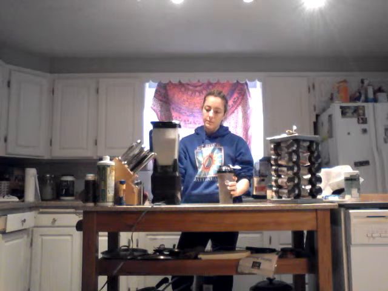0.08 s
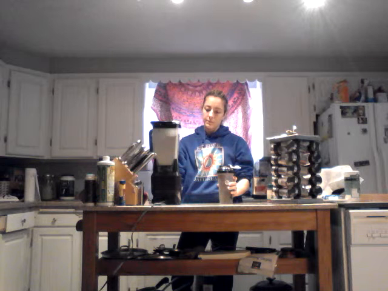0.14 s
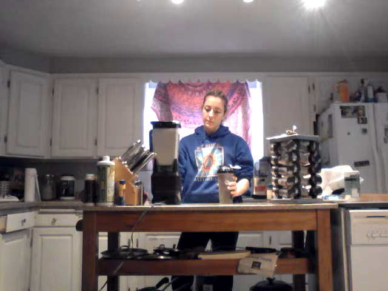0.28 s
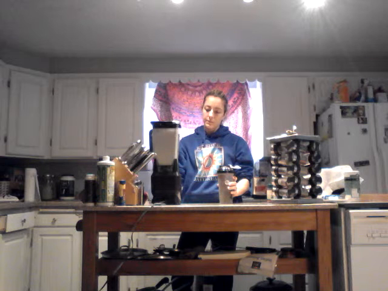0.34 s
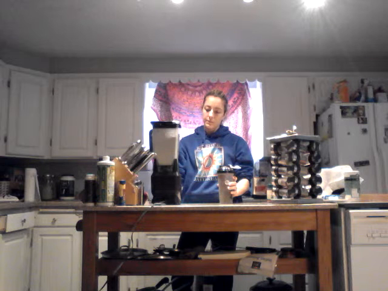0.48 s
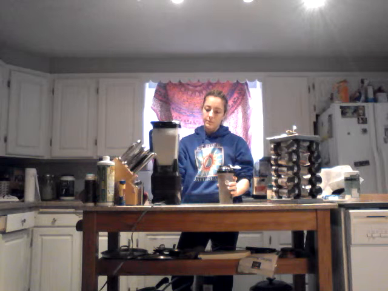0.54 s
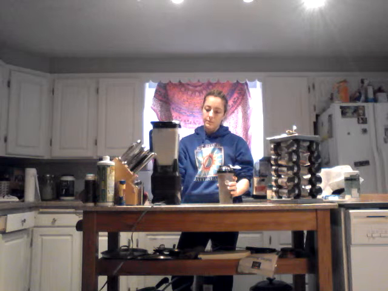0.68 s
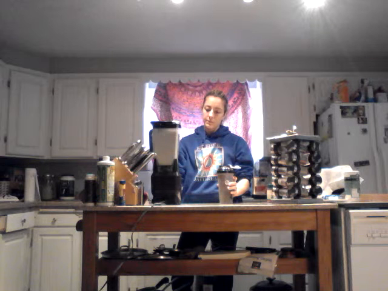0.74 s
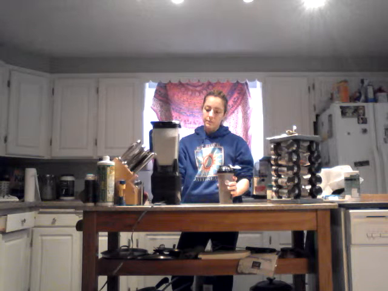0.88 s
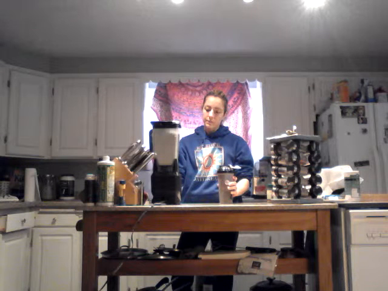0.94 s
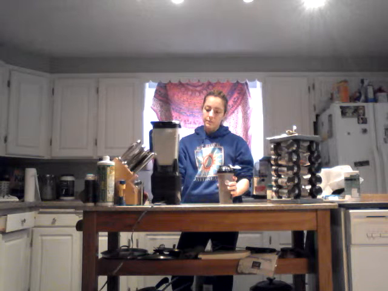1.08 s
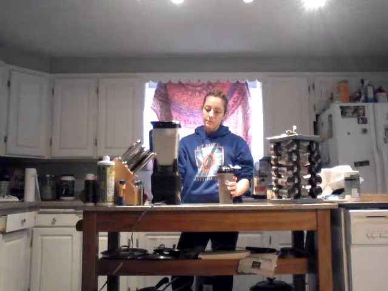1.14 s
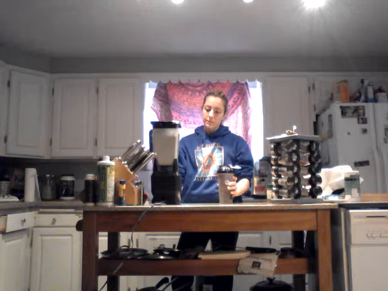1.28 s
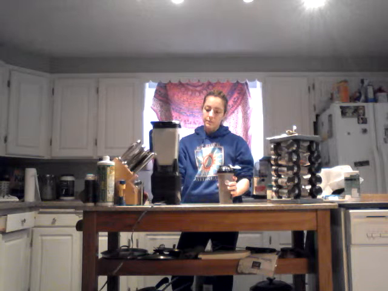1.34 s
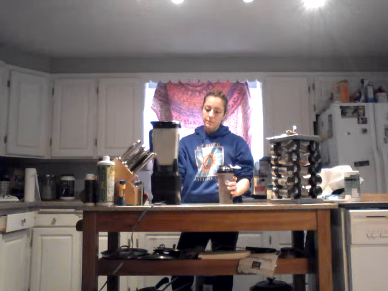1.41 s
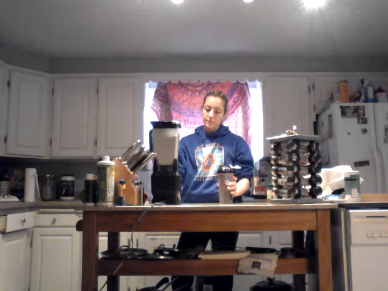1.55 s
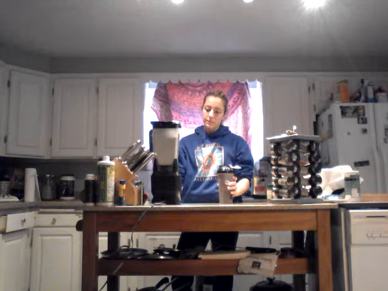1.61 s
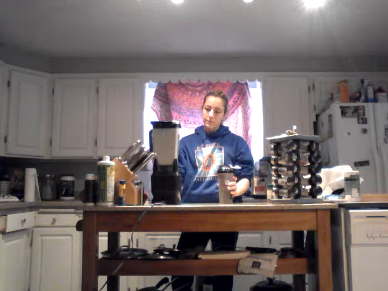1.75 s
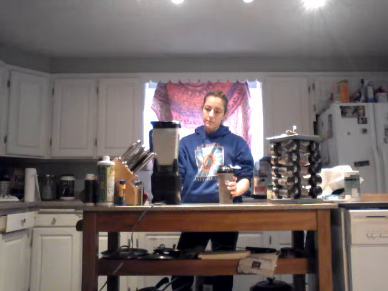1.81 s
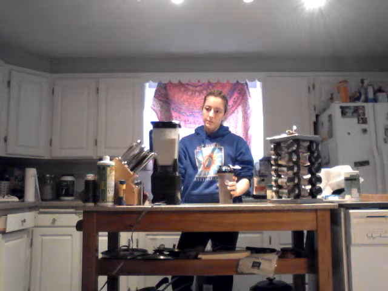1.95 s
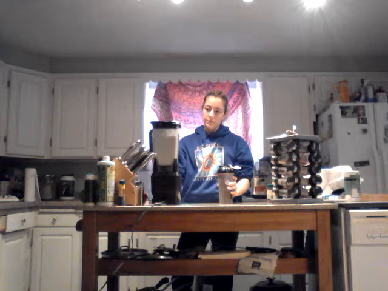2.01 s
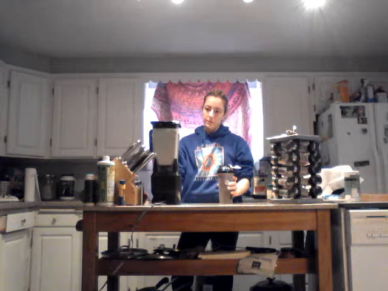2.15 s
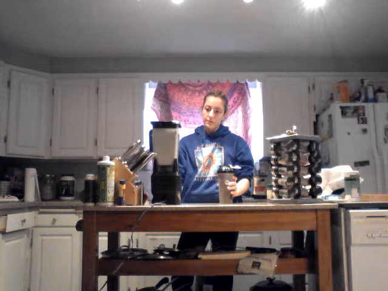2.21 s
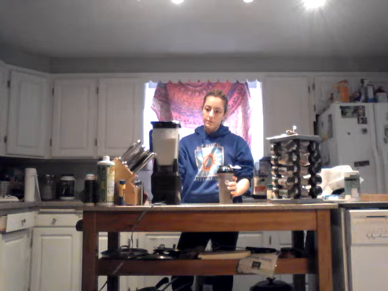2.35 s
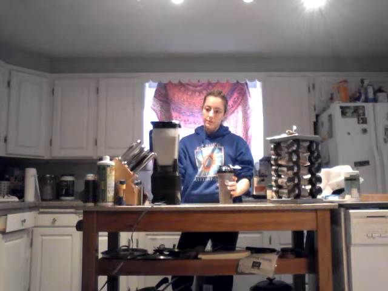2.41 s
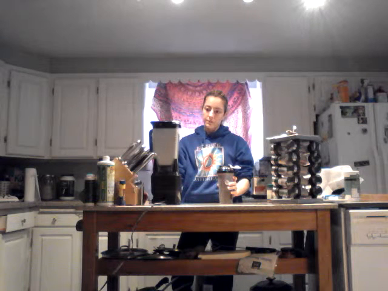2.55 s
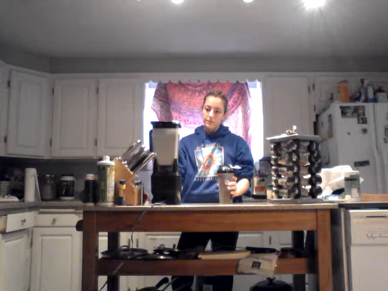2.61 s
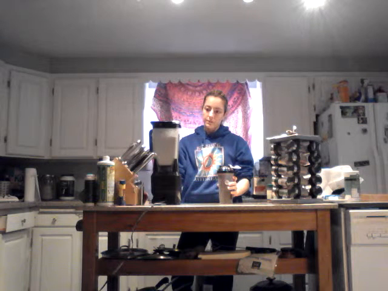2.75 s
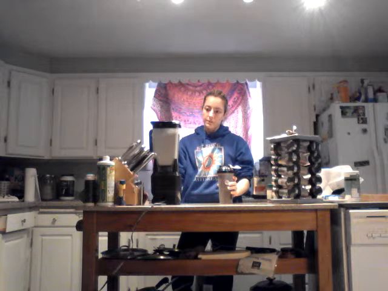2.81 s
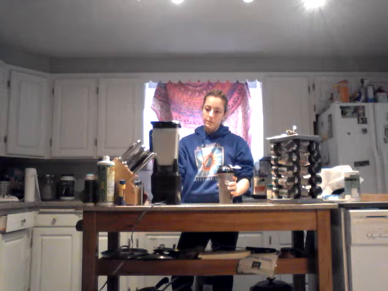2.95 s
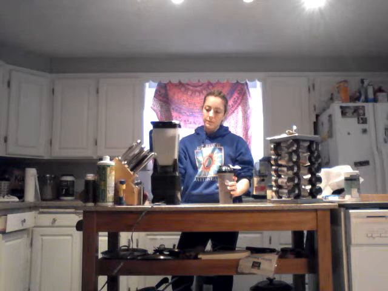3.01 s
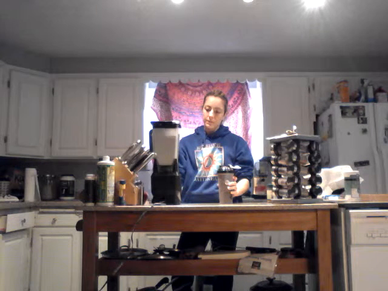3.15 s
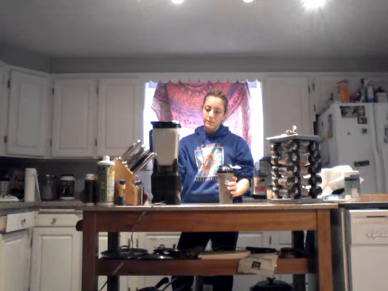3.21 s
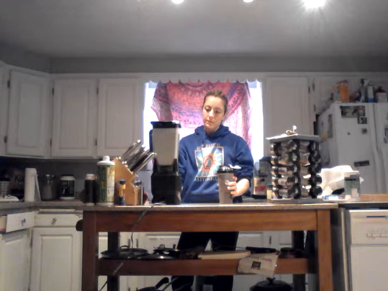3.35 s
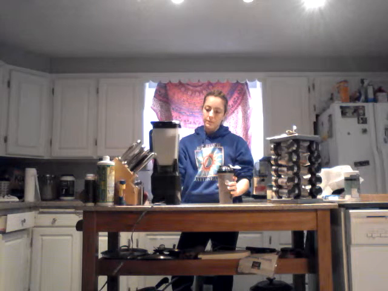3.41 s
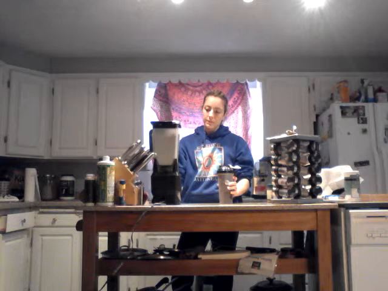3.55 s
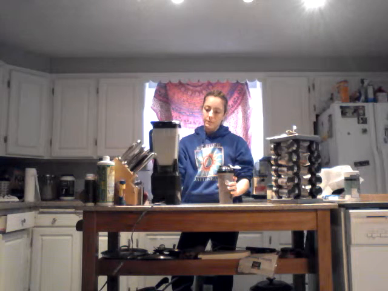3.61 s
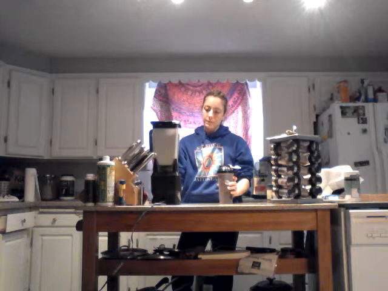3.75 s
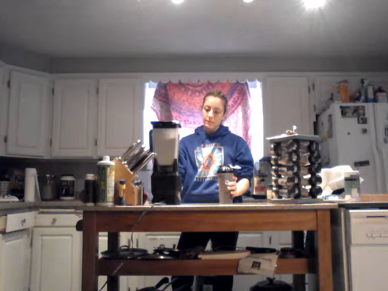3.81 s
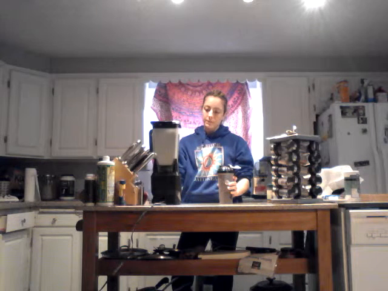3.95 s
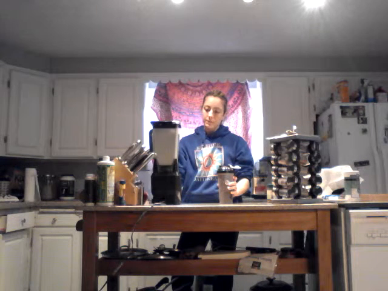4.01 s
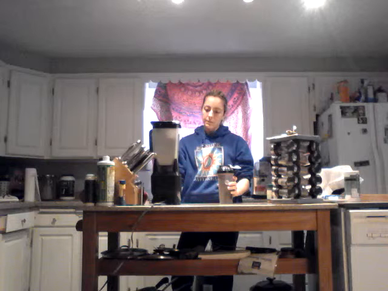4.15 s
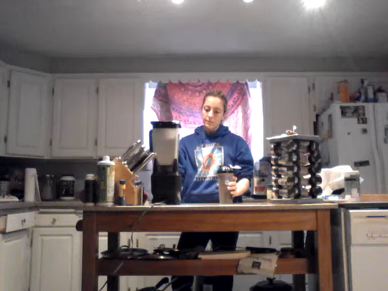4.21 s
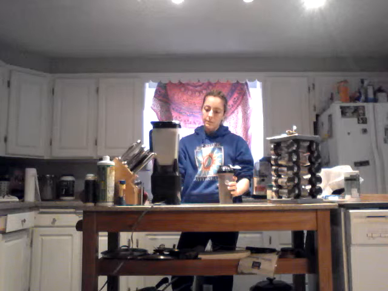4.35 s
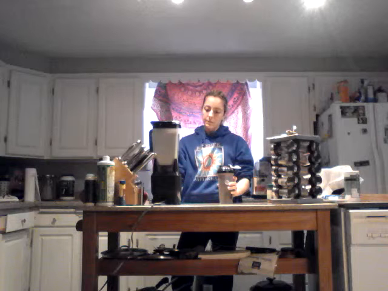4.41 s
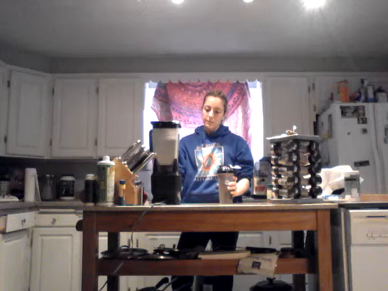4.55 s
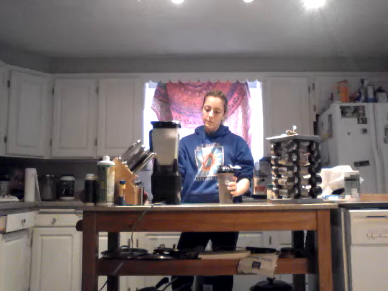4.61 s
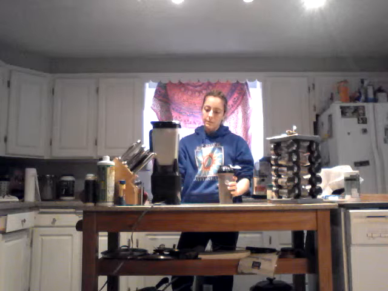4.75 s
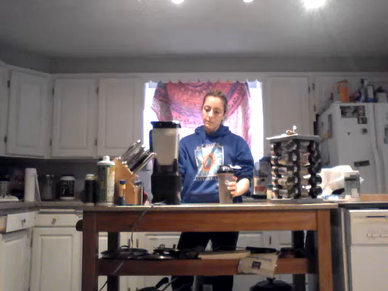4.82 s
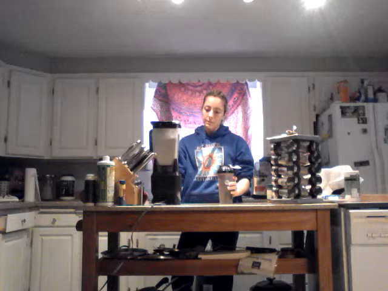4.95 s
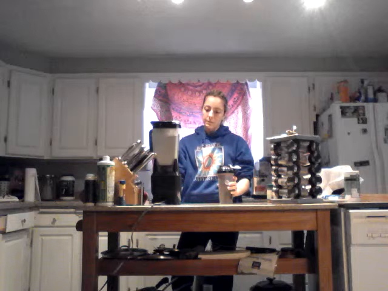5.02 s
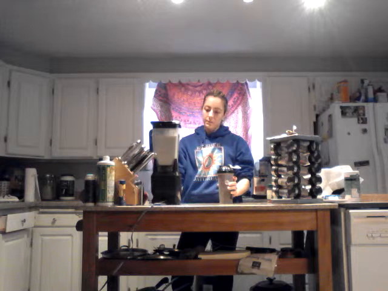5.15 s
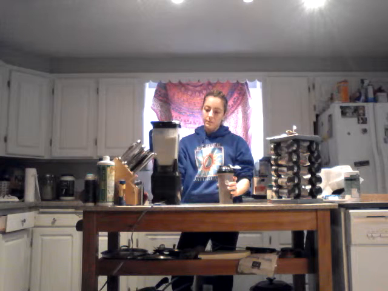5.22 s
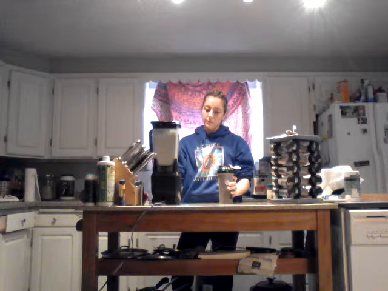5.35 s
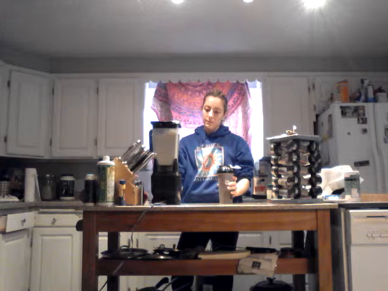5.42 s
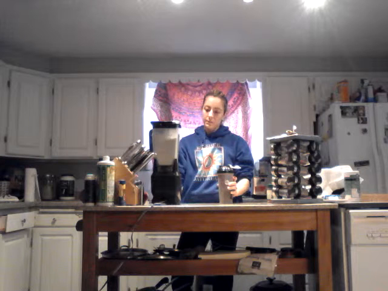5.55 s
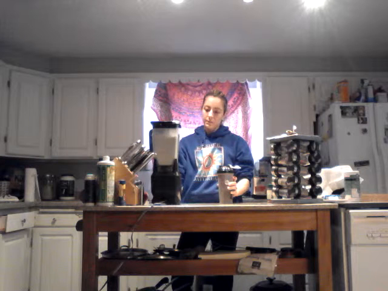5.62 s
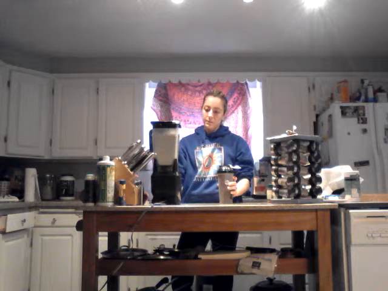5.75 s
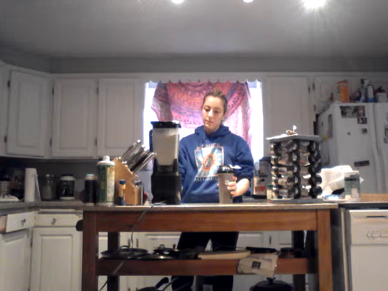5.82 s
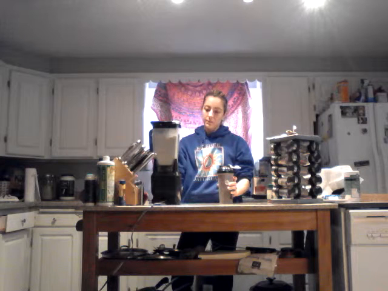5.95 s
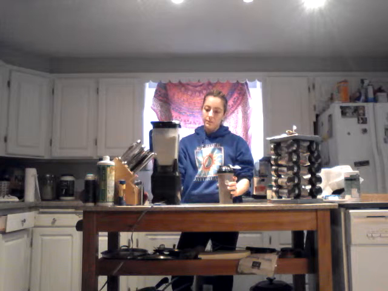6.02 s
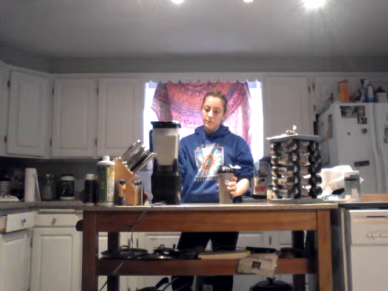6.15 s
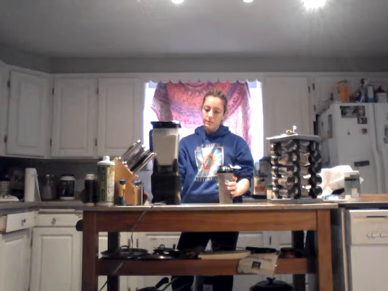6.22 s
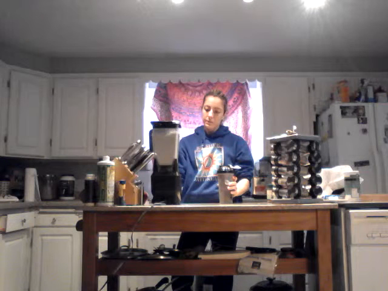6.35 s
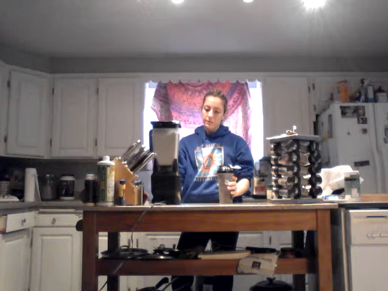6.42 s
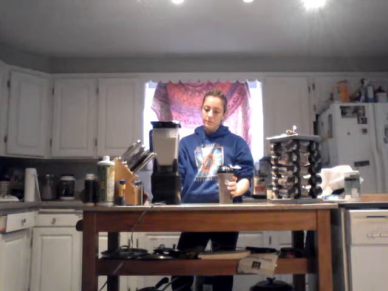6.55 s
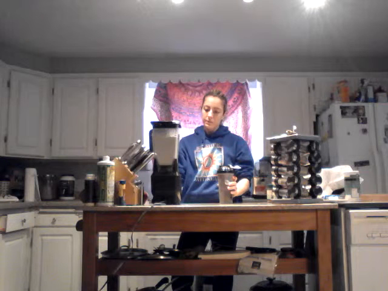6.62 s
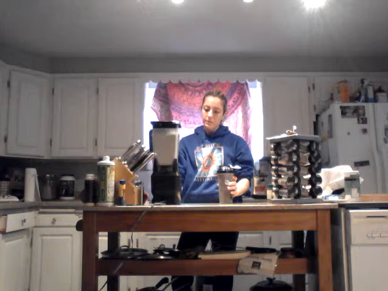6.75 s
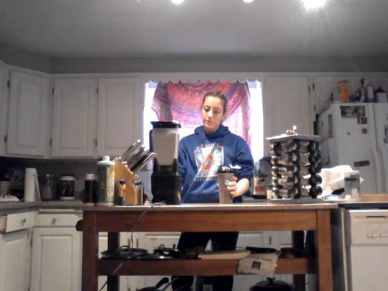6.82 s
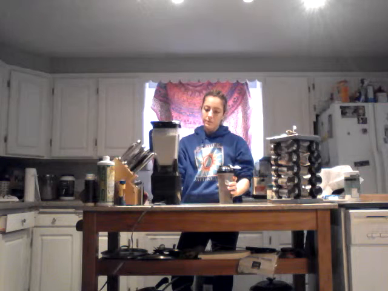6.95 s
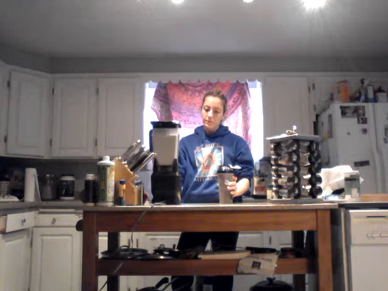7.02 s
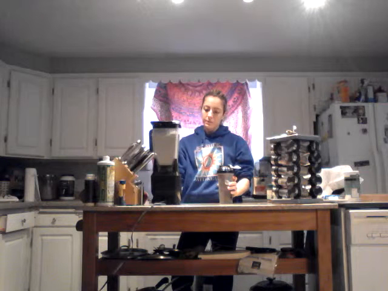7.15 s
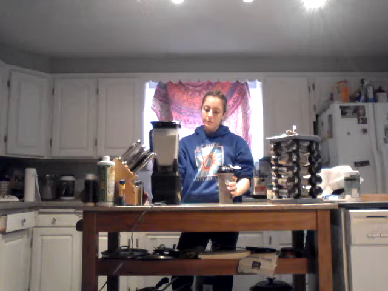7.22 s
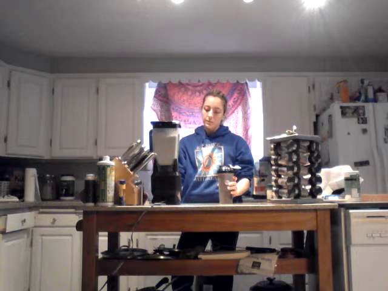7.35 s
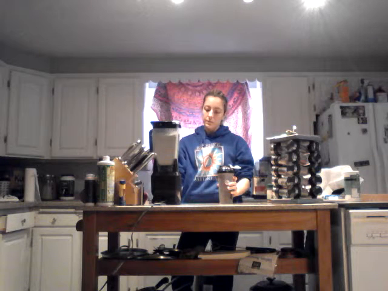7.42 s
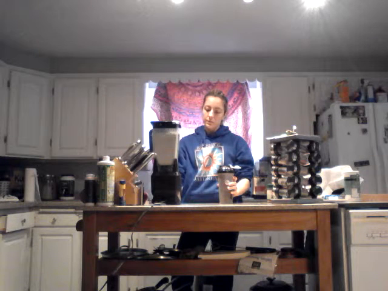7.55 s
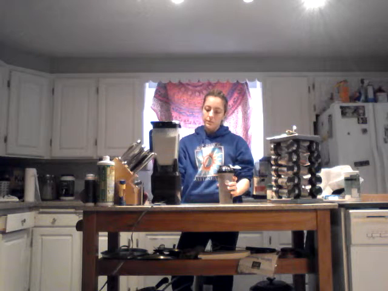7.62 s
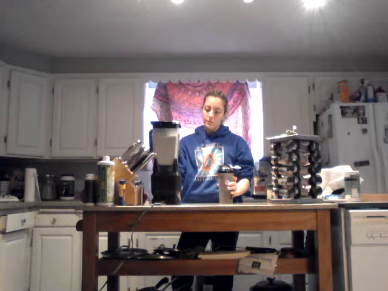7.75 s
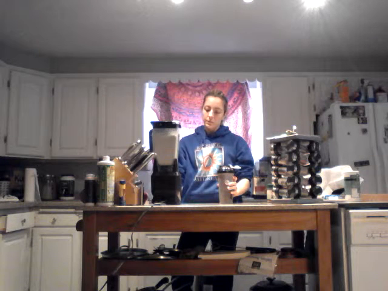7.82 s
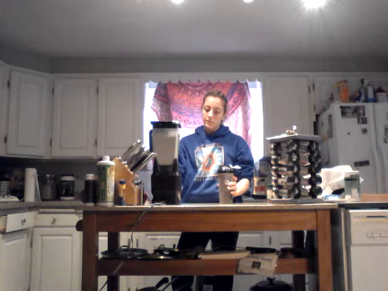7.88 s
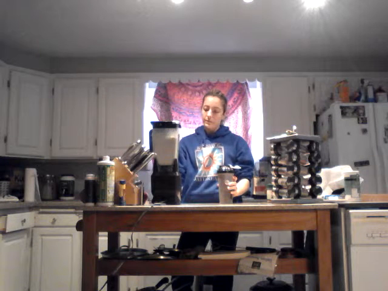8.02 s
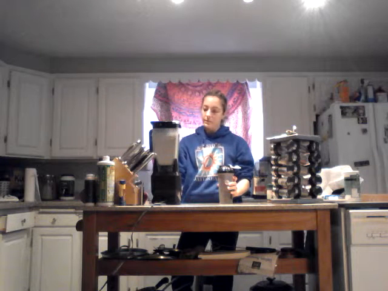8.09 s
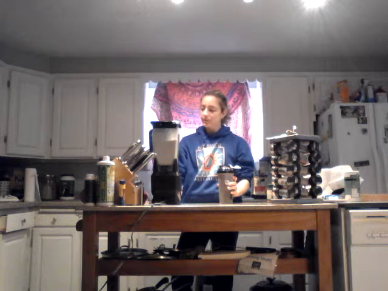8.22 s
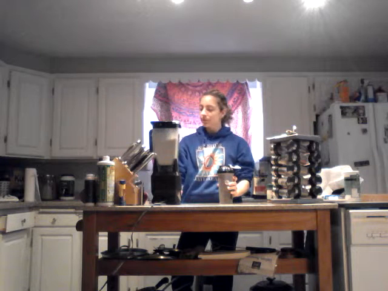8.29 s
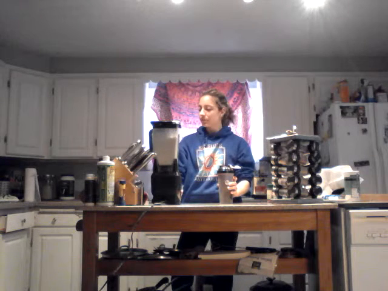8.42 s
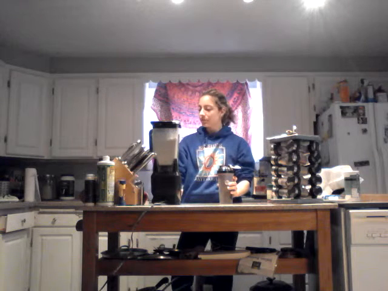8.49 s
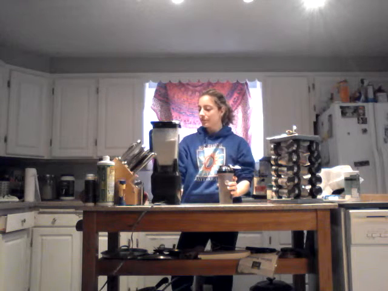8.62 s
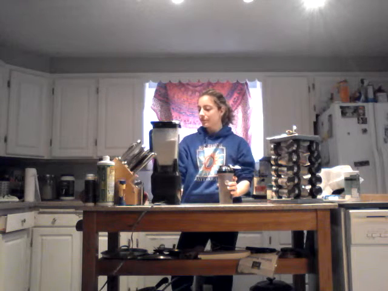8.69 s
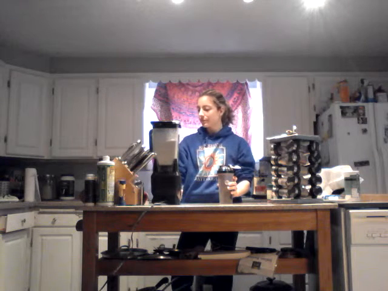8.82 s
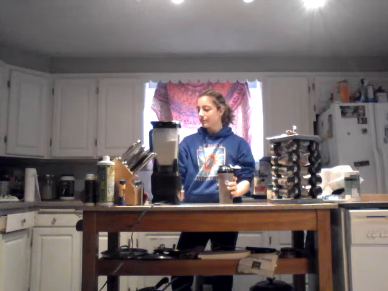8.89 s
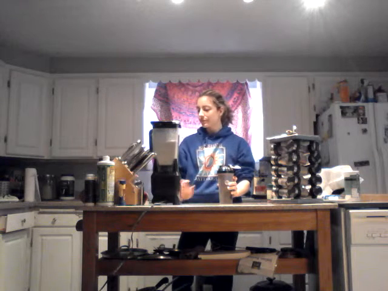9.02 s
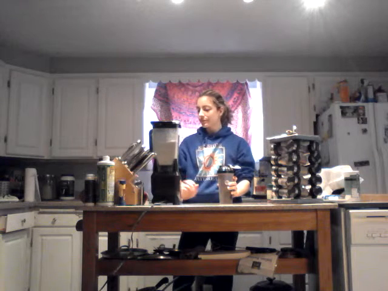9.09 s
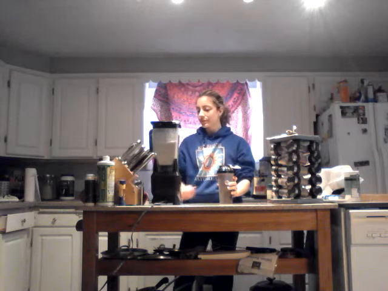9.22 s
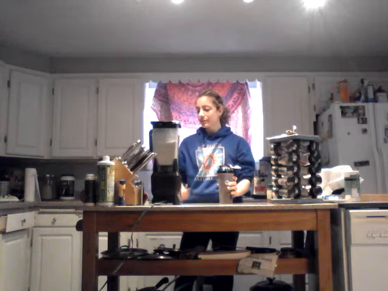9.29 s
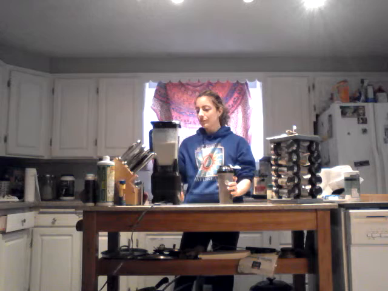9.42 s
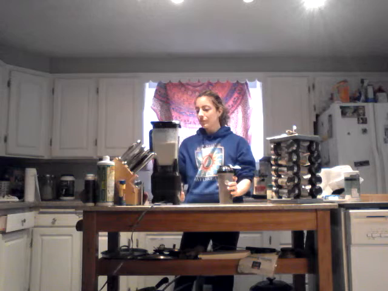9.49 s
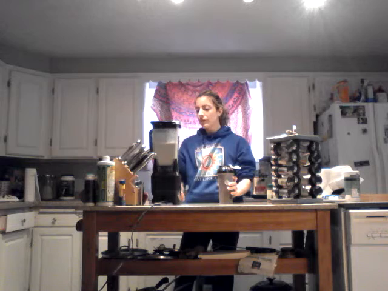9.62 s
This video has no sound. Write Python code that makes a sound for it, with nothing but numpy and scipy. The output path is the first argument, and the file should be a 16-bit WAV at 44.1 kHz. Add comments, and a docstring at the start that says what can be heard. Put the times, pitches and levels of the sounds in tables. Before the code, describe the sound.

A countertop blender is already running, loud and bright, with rushing motor air, a churning mix and fuzzy ringing from the jar. About four seconds in, the tone shifts as the mix thins and begins softly gulping air about twice a second. Near the end the motor is switched off, and its whine glides downward and fades to a faint hush. The hard kitchen walls add a short echo.

```python
"""A countertop blender roars in a hard-walled kitchen, bright and loud, with fuzzy singing tones.
The roar is air from the motor fan plus the churning mix; the jar and housing do the singing.
About four seconds in, the mix turns thin and its whirlpool gulps air about twice a second.
Then the motor is switched off, and the fan's whine glides down through the pitches at which
housing and room ring."""
import sys
import numpy as np
from scipy import signal
from scipy.fft import rfft, irfft, next_fast_len
from scipy.io import wavfile
from scipy.ndimage import uniform_filter1d, minimum_filter1d, map_coordinates

SR = 44100
rng = np.random.default_rng(int(sys.argv[2]) if len(sys.argv) > 2 else 0)


def output_pcm(signal):
    """Save a mono or channel-first signal as 16-bit PCM at the path in sys.argv[1].

    Samples are clipped to [-1, 1] before scaling.
    """
    pcm = np.clip(np.atleast_2d(signal).T, -1, 1) * 32767
    wavfile.write(sys.argv[1], SR, np.round(pcm).astype(np.int16))


N = 426006
T = np.arange(N) / SR
THINNING_AT_S, THIN_AT_S, SWITCH_OFF_S = 3.78, 4.5, 7.48


def motor():
    """The fan slows and quietens after switch-off; the mix goes from thick to thin to settled."""
    full_hz, fall_hz_per_s, easing_hz_per_s2 = 2221, 1138, 87
    since = np.clip(T - SWITCH_OFF_S, 0, None)
    blade_hz = np.clip(full_hz - fall_hz_per_s * since + easing_hz_per_s2 * since ** 2, 60, None)
    level_db = -13.5 + 1.416 * 20 * np.log10(blade_hz / full_hz)
    thinning_s, settles_at_s, settling_s = 0.24, 7.61, 0.71
    thick = np.exp(-np.clip(T - THINNING_AT_S, 0, None) / thinning_s)
    settled = np.clip((T - settles_at_s) / settling_s, 0, 1)
    thin = np.clip(1 - thick - settled, 0, 1)
    return blade_hz, level_db, (thick, thin, settled)


# The roar's tone with a thick, a thin and a settled mix: (pitch [Hz], relative level [dB])
THICK_TONE = [(120, -27), (190, -24), (230, -21), (450, -13.5), (1500, -16.5), (2000, -9), (2250, -6.5),
              (2700, -3), (3100, -6), (3850, -1), (4600, -7.5), (5900, -19), (6600, -21), (14000, -43.5),
              (15000, -70)]
THIN_TONE = [(120, -31), (190, -23.5), (230, -21.5), (450, -14.5), (1400, -17), (1750, -10), (2250, -2.5),
             (2700, -3), (3100, -8.5), (4000, -2.5), (4450, -5), (5400, -12.5), (6500, -19.5), (10500, -37),
             (14000, -69)]
SETTLED_TONE = [(120, -26), (230, -17), (450, -10.5), (1000, -8), (1500, -8), (2000, -5.5), (3100, -8),
                (3600, -2.5), (4400, -1), (5400, -11), (6800, -19), (9900, -38.5), (12000, -92)]

def roar(level_db, shares):
    """Rushing air and churning mix: the tone follows the mix, and the bass sloshes in lumps."""
    layers = [rush(tone, patchy_db=0.8) for tone in (THICK_TONE, THIN_TONE, SETTLED_TONE)]
    churn = sum(np.sqrt(share) * layer for share, layer in zip(shares, layers))
    slosh = unit(amp(5.5 * wobble(12)) * fuzzy(hz=190, width_hz=70))
    shudder_db = 0.43 * wobble(4.08) + 0.45 * wobble(11) + 0.88 * wobble(40)
    return amp(level_db + shudder_db) * (churn + amp(-37) * slosh)


# Singing tones, with a level against the roar for each state of the mix:
# (pitch [Hz], width [Hz], thick [dB], thinning [dB], thin [dB], settled [dB])
SINGING_TONES = [(288.3, 13, -35, -33.5, -42, -44), (2320, 540, -14.5, -23, -17, -60),
                 (2530, 77, -60, -23, -23, -61), (2680, 220, -32, -24, -27, -62),
                 (3900, 420, -11, -61, -60, -60), (3800, 49, -18, -60, -60, -60),
                 (4170, 350, -60, -28, -16.5, -28), (4450, 106, -60, -42, -23.5, -20),
                 (4420, 50, -60, -60, -22.5, -45), (5300, 650, -60, -16.5, -30, -15),
                 (5320, 51, -60, -26, -60, -58), (5640, 940, -16.5, -60, -60, -62)]

def singing(level_db, settled):
    """Jar and housing sing at certain pitches for as long as the mix suits them."""
    change_s, surge_db = 0.046, 0.64
    thinning, thin = (np.clip((T - at) / change_s, 0, 1) for at in (THINNING_AT_S, THIN_AT_S))
    states = np.array([1 - thinning, thinning - thin, thin * (1 - settled) ** 2, settled ** 2])
    centre, width, *levels_db = np.transpose(SINGING_TONES)
    gains = amp(levels_db) * np.sqrt(SR / width)
    bands = lambda hz: gains @ bump(hz - centre[:, None], width[:, None] / 2)
    tones = np.sum(states * filtered(rng.standard_normal(states.shape), bands), axis=0)
    return amp(level_db + surge_db * wobble(8.9)) * tones


# How well the housing lets the whine out: (pitch [Hz], boost [dB])
HOUSING_BOOST = [(150, -10), (290, 3), (370, -6), (470, 4), (650, 7), (900, 6.5), (1150, 3), (1350, 6),
                 (1600, 4), (2500, -12), (3200, -1), (4000, 13), (5500, 8), (6500, -9)]

def whine(blade_hz, level_db):
    """The slowing fan whirrs at one, two and three times the rate at which its blades pass."""
    off = round(SWITCH_OFF_S * SR)
    hz, level_db, size = blade_hz[off:], level_db[off:], N - off
    whirr = sum(amp(db + along(HOUSING_BOOST, k * hz)) * fuzzy(k * hz, 2 / 7 * k * hz, size)
                for k, db in enumerate([-16, -20.5, -18.5], 1))
    narrow_core = amp(-22.5 + along(HOUSING_BOOST, hz)) * fuzzy(hz, 0.1 * hz, size)
    fade_in = np.clip((T[off:] - SWITCH_OFF_S) / 0.2, 0, 1)
    gain = amp(level_db + 0.39 * wobble(10, size)) * fade_in
    return np.pad((whirr + narrow_core) * gain, (off, 0))


def jar_slide():
    """The jar's roar swells briefly, then slides down and fades as the mix slows."""
    peak_at_s, rise_s = 7.8, 0.071
    since = np.clip(T - peak_at_s, 0, None)
    swell = np.clip(1 + (T - peak_at_s) / rise_s, 0, 1) * amp(-22 - 170 * since ** 2)
    hz = np.clip(2327 - 4400 * since ** 2, 500, None)
    return swell * fuzzy(hz, width_hz=160)


# Gulps of the whirlpool:
# (time [s], change in the roar [dB], low rush [dB], jar ring [dB], rising rush [dB], hiss [dB])
GULP_EVENTS = [(4.249, 1, -31, -31, -33, -40), (4.679, -0.2, -28, -31, -26, -30),
               (5.101, -0.5, -26, -29, -36, -33), (5.558, 0, -25, -28, -24, -31),
               (6.08, 0, -26, -35, -23.5, -34), (6.599, -2, -26, -27, -25, -25),
               (6.99, -0.5, -27, -28.5, -28, -29), (7.451, -0.4, -30, -33, -35, -28),
               (7.806, 0.8, -23, -41, -35, -22)]

def gulps():
    """The whirlpool draws air: a low rush, the jar rings, then a rising rush and hiss as it closes."""
    times, change_db, *levels_db = np.transpose(GULP_EVENTS)
    low, ring, rising, hiss = amp(levels_db)
    pulses = lambda delay_s, spread_s=0.16: bump(T - times[:, None] - delay_s, spread_s)
    closing = pulses(0.18)
    glides = [point for at in times for point in [(at + 0.05, 0.9), (at + 0.35, 1.1)]]
    rising_hz = 3070 * np.interp(T, *np.transpose(glides))
    sound = (low @ pulses(0) * fuzzy(hz=1850, width_hz=600)
             + ring @ pulses(0.1) * fuzzy(hz=2765, width_hz=70)
             + rising @ closing * fuzzy(rising_hz, width_hz=350)
             + hiss @ closing * fuzzy(hz=4670, width_hz=1800))
    return sound, change_db @ pulses(0.058, spread_s=0.084)


# Brief swells of a low hum: (time [s], level [dB])
HUM_SWELLS = [(0.15, -37), (2.05, -40), (2.36, -38), (3.21, -36.5), (3.68, -40), (3.92, -39), (5.3, -36.5),
              (6.7, -44)]

def hum_swells():
    """A low hum near 476 Hz swells briefly now and then, wavering a little."""
    times, levels_db = np.transpose(HUM_SWELLS)
    swells = amp(levels_db) @ bump(T - times[:, None], spread=0.063)
    hz = 476 + 4 * wobble(10)
    return swells * np.sin(2 * np.pi * np.cumsum(hz) / SR)


# Pitches that housing, table and room boost or weaken: (pitch [Hz], width [Hz], boost [dB])
PEAKS_AND_DIPS = [(235, 16, 4.0), (257, 22, -3.0), (278, 130, 3.8), (322, 30, -4.5), (382, 75, -7),
                  (415, 24, 2.0), (438, 22, -2.5), (472, 34, 9.6), (494, 17, -4), (511, 26, 6.5),
                  (552, 30, -3.5), (597, 24, 1.2), (628, 24, -3), (670, 16, -2.5), (689, 26, 4.2),
                  (746, 23, -2.7), (797, 31, -2.6), (857, 27, -3.7), (909, 52, 1.9), (962, 28, -2.5),
                  (1019, 64, 3.2), (1109, 78, -2.5), (1196, 41, -4.1), (1357, 56, 4), (1507, 26, 3.2),
                  (1539, 30, -2.3), (1614, 38, -4.6), (1669, 25, -2.3), (1742, 50, 2.0), (1800, 40, -5.2),
                  (1918, 94, 2.7), (2044, 37, -2.5), (2127, 59, -4.0), (2200, 85, 3.8), (2287, 34, 3.2),
                  (2328, 37, -2.9), (2363, 117, 5.8), (2444, 21, -3.1), (2472, 49, -7.5), (2524, 37, -4.9),
                  (2580, 39, 2.2), (2648, 57, 3.2), (2695, 37, -4.0), (2742, 93, 4.5), (2929, 38, 3.3),
                  (2989, 21, 4.3), (3053, 154, -3.5), (3133, 31, -2.5), (3191, 24, -3.9), (3375, 51, -2.4),
                  (3440, 20, 2.2), (3476, 31, -3.8), (3665, 35, 1.0), (3750, 60, 1.5), (3793, 24, -2.5),
                  (3827, 41, 2.5), (3872, 26, -3.5), (3906, 31, 5.0), (3965, 60, -2.0), (4030, 35, 2.0),
                  (4120, 54, -2.6), (4261, 28, 4.5), (4416, 66, 4.8), (4512, 37, -3.3), (4596, 43, -2.8),
                  (5137, 41, 2.5), (5232, 23, 4.5), (5312, 40, 4.6), (5481, 30, 2.8), (5570, 69, -2.5),
                  (5800, 34, 4.5), (6087, 77, -2.2), (6257, 103, 3.4), (6364, 94, -2.8), (6489, 76, -2.6)]

def kitchen(x):
    """Housing, table and room shape the tone, and the hard walls add a short echo."""
    boost = lambda f: amp(sum(db * bump(f - hz, width / 2) for hz, width, db in PEAKS_AND_DIPS))
    t, echo_s = T[:SR // 2], 0.29
    echo = rng.standard_normal(len(t)) * amp(-60 * t / echo_s)
    echo[0] = 0
    x = filtered(x, boost)
    return x + amp(-15) * signal.fftconvolve(x, echo / np.linalg.norm(echo))[:N]


# The tone of the kitchen's background noise: (pitch [Hz], relative level [dB])
HUSH_TONE = [(120, -28), (280, -2), (480, 0.5), (1300, 4), (2400, -4), (3300, -2), (4400, -5), (6000, -29),
             (9000, -41), (15000, -61)]

def hush():
    """A faint, patchy noise fills the room."""
    return amp(-40.5) * rush(HUSH_TONE, patchy_db=2.5)


def amp(db):
    """Turn decibels into a number to multiply by."""
    return 10 ** (np.asarray(db) / 20)


def unit(x):
    """Scale a signal to an average power of 1."""
    return x / np.sqrt(np.mean(x ** 2) + 1e-20)


def bump(distance, spread):
    """A bell shape, 1 at its centre."""
    return np.exp(-(distance / spread) ** 2)


def along(points, hz):
    """Read between a table's (pitch, value) points on a musical pitch scale."""
    pitches, values = np.transpose(points)
    return np.interp(np.log(hz + 1), np.log(pitches + 1), values)


def wobble(rate, size=N):
    """A smooth curve through `rate` random values a second."""
    place = np.cumsum(np.broadcast_to(rate, size)) / SR
    return unit(map_coordinates(rng.standard_normal(int(place[-1]) + 4), [place]))


def fuzzy(hz, width_hz, size=N):
    """A band of noise around a pitch, which may move."""
    phase = 2 * np.pi * np.cumsum(np.broadcast_to(hz, size)) / SR
    return wobble(width_hz, size) * np.sin(phase) + wobble(width_hz, size) * np.cos(phase)


def filtered(x, gain_at):
    """Turn each pitch in x up or down by gain_at(pitch)."""
    size = next_fast_len(N + SR // 2)
    return irfft(rfft(x, size) * gain_at(np.fft.rfftfreq(size, 1 / SR)), size)[..., :N]


def rush(tone, patchy_db):
    """Noise with a given tone and random louder and softer patches."""
    grid = signal.stft(rng.standard_normal(N), nperseg=512)[2]  # pitch by time
    patches = uniform_filter1d(uniform_filter1d(rng.standard_normal(grid.shape), 5, 0), 12, 1)
    noise = signal.istft(grid * amp(patchy_db * unit(patches)), nperseg=512)[1][:N]
    return unit(filtered(noise, lambda hz: amp(along(tone, hz))))


def scene():
    """The blender in its kitchen over a faint hush, the same in both channels."""
    blade_hz, level_db, shares = motor()
    gulping, change_db = gulps()
    roar_db = level_db + change_db
    blender = roar(roar_db, shares) + singing(roar_db, settled=shares[2])
    blender += whine(blade_hz, level_db) + jar_slide() + gulping
    mono = kitchen(blender + hum_swells() + hush())
    return np.array([mono, mono])


def record(dry):
    """Cut the bass, hold down the loudest peaks and drop the treble above 15.6 kHz."""
    lowest_hz, highest_hz = 190, 15600
    x = signal.sosfilt(signal.butter(6, lowest_hz, "high", fs=SR, output="sos"), dry)
    safe_gain = np.minimum(1, 0.99 / (np.abs(x) + 1e-9))
    x = x * uniform_filter1d(minimum_filter1d(safe_gain, size=441), size=221)
    return filtered(x, lambda hz: hz < highest_hz)


dry = scene()
out = record(dry)
output_pcm(out)
```